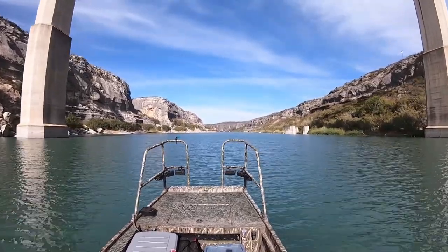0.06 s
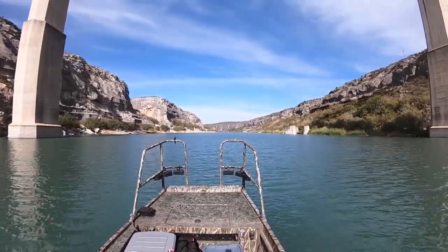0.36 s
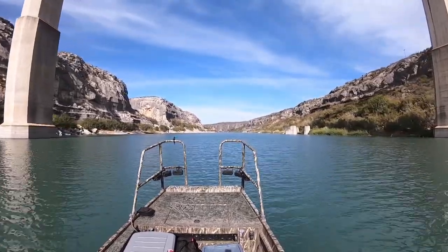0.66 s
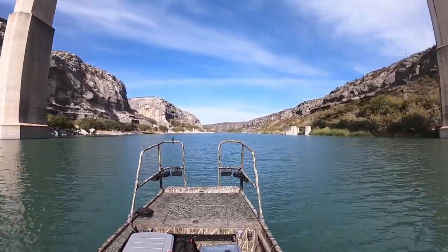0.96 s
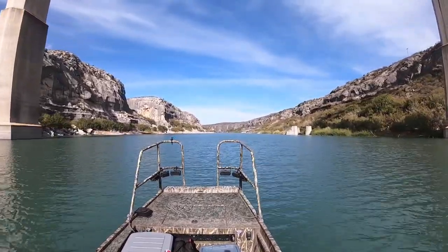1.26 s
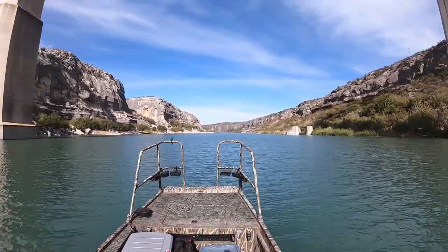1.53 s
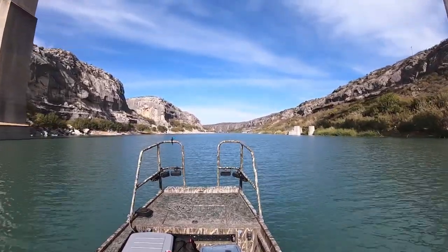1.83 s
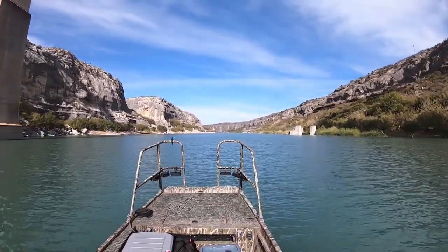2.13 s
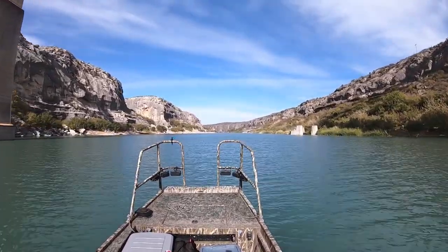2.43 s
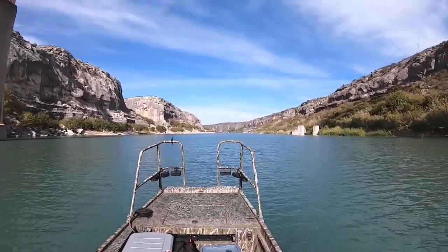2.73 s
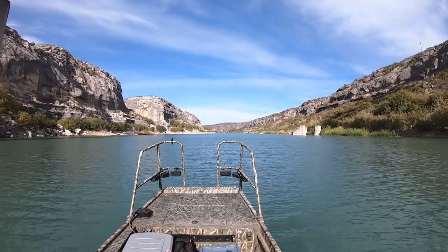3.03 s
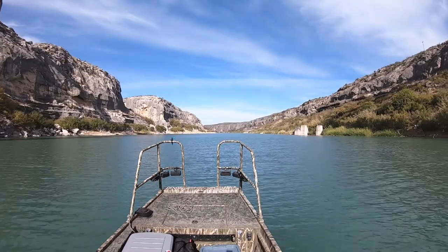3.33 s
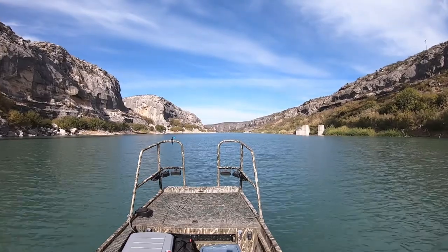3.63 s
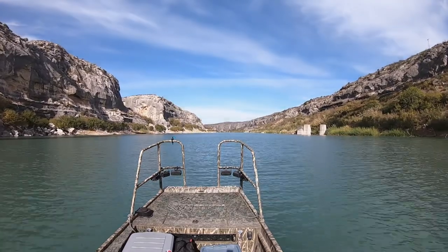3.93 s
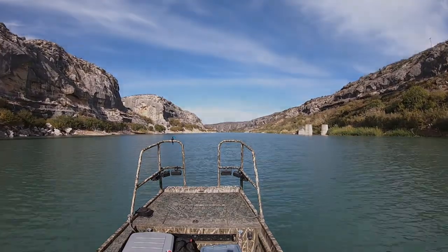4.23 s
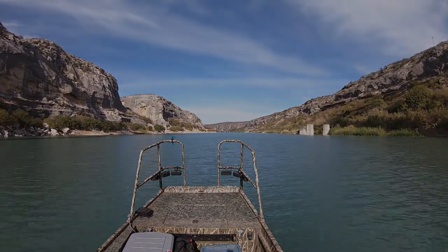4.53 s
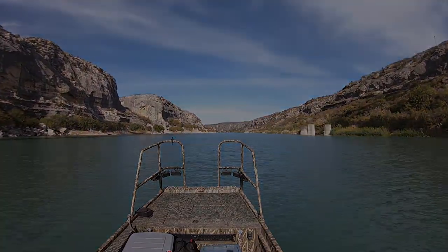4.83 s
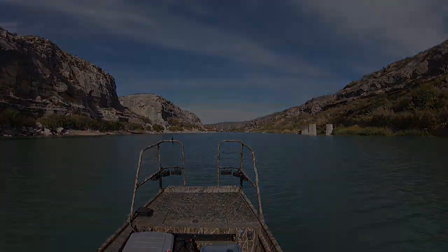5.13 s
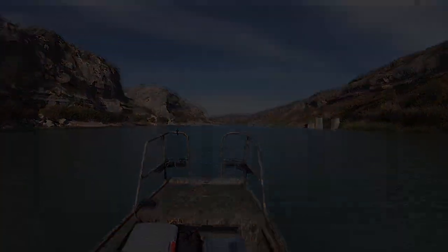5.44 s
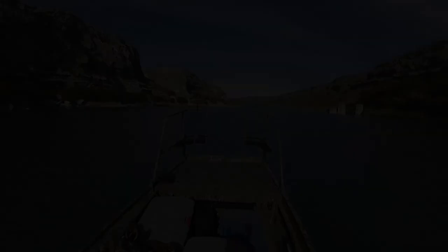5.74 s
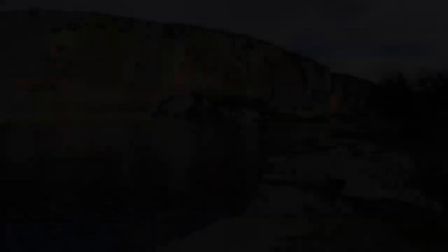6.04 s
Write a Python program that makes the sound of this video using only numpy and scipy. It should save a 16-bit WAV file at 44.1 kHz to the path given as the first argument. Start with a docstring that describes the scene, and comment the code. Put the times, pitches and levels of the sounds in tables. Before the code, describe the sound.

A small outboard motor runs at steady throttle, heard from aboard a flat-bottom boat on a river. Its low, slightly pulsing drone carries a buzz and fast mechanical clatter. Spray hisses lightly on the right and wind buffets the microphone. After about four seconds everything fades out together, and a faint puff of wind rumble follows at the very end.

```python
"""On a river, aboard a flat-bottom boat pushed by a small four-stroke outboard at steady throttle.
Periodic exhaust puffs form a harmonic series that beats against the propeller's blade tone.
The casing buzzes in forced vibration, valves and pistons clatter, and the wake hisses on the right.
The boat fades out and gives way to a faint rumble of wind on the microphone."""
import sys
import numpy as np
from scipy import signal
from scipy.fft import rfft, irfft, next_fast_len
from scipy.io import wavfile
from scipy.ndimage import map_coordinates

SR = 44100
rng = np.random.default_rng(int(sys.argv[2]) if len(sys.argv) > 2 else 0)


def store_pcm(level_fs):
    """Save levels as 16-bit WAV."""
    pcm = np.round(np.clip(level_fs, -1, 1) * 32767).astype(np.int16)
    wavfile.write(sys.argv[1], SR, np.atleast_2d(pcm).T)


N = 272979
TIME = np.arange(N) / SR
CYCLE_HZ, SAG_HZ_PER_S = 29.86, .03  # starting rate of four-stroke cycles, and its sag under load


def amp(db):
    """Amplitude ratio of a level in decibels."""
    return 10 ** (np.asarray(db) / 20)


def unit(x):
    """Normalisation to rms 1."""
    return x / np.sqrt(np.mean(x ** 2) + 1e-20)


def wobble(rate):
    """Smooth random modulation: a spline through `rate` Gaussian knots a second."""
    knots = rng.standard_normal(int(N * rate / SR) + 4)
    places = np.arange(0, len(knots) - 1, 1 / 10)
    return np.interp(TIME * rate, places, map_coordinates(knots, [places]))


def burst(cycle, place, length):
    """A pulse train: one Gaussian bump in every engine cycle."""
    return np.exp(-(((cycle - place + .5) % 1 - .5) / length) ** 2)


def filtered(x, response):
    """Linear filtering: the spectrum of x is multiplied by a frequency response."""
    size = next_fast_len(N + 8192)
    return irfft(rfft(x, size) * response(np.fft.rfftfreq(size, 1 / SR)), size)[..., :N]


def coloured(white, spectrum):
    """Spectral shaping: white noise of rms 1 takes on a left and a right spectral density."""
    table_hz, *sides = np.transpose(spectrum)
    gain = lambda hz: amp([np.interp(np.log(hz + 1), np.log(table_hz), side) for side in sides])
    return filtered(white, gain) * np.sqrt(SR / 2)


def two_sided(shared, lead_s=.00023):
    """Partial coherence: stereo white noise whose shared part reaches the right side first."""
    right, own = rng.standard_normal((2, N))
    late = filtered(right, lambda hz: np.exp(-2j * np.pi * hz * lead_s))
    left = shared * late + np.sqrt(1 - shared ** 2) * own
    return np.array([left, right])


# Spectrum of the breeze. Each row: frequency in Hz, left and right relative density in dB.
BREEZE_SPECTRUM = [(8, -65, -68), (32, -54.5, -56.5), (55, -59.5, -58), (111, -72, -81), (252, -99, -101),
                   (800, -106, -107), (2000, -119, -119), (5000, -123, -123), (15000, -138, -138)]

def breeze(start_s=5.918, rise_s=.012, gust_db=12, gust_s=.052, freshen_db_per_s=20, tick_t60_s=.06):
    """As the scene changes, a soft tick decays exponentially; then light turbulence gusts once, drops and
    freshens."""
    age = np.maximum(TIME - start_s, 0)
    tick = amp(-43.5 - 60 * age / tick_t60_s) * (age > 0)
    strength_db = -2.5 + gust_db * np.exp(-(age / gust_s) ** 2) + freshen_db_per_s * age
    onset = np.minimum(age / rise_s, 1)
    return amp(strength_db) * onset * wind(BREEZE_SPECTRUM, eddy_db=1.0) + tick


# Spectrum of the head wind. Each row: frequency in Hz, left and right density in dB per Hz.
HEAD_WIND_SPECTRUM = [(5, -63, -62), (25, -55.5, -49), (45, -55, -55), (75, -57, -50), (140, -60, -57),
                      (298, -64.5, -61.5), (1000, -110, -110)]

def wind(spectrum=HEAD_WIND_SPECTRUM, eddy_db=5.5):
    """Turbulent pressure: eddies buffet each microphone port independently."""
    eddies = amp(eddy_db * np.array([wobble(7), wobble(7)]))
    return coloured(rng.standard_normal((2, N)) * unit(eddies), spectrum)


# Spectrum of the spray. Each row: frequency in Hz, left and right density in dB per Hz.
SPRAY_SPECTRUM = [(800, -105, -95), (3500, -87, -85), (5000, -104, -84.5), (7100, -105, -81.5),
                  (7800, -107, -85), (8300, -110, -81.5), (8860, -114, -85.5), (9850, -116, -82.5),
                  (11080, -126, -93), (12740, -134, -99), (14700, -138, -102), (14800, -142, -126)]

def wake(splash_db=.63, droplet_db=1.3):
    """Incoherent summation: fine droplets peeling off the hull add up to a flickering hiss."""
    flow = amp(splash_db * wobble(18) + droplet_db * wobble(900))
    return coloured(two_sided(shared=.18) * unit(flow), SPRAY_SPECTRUM)


# Valve and piston knocks. Each row: place in the cycle from 0 to 1, half-width in cycles, relative power.
ENGINE_KNOCKS = [(.18, 0.062, 0.34), (.4, 0.036, .25), (.73, 0.086, 0.53), (.84, .05, 0.38)]
# Spectrum of the clatter. Each row: frequency in Hz, left and right density in dB per Hz.
CLATTER_SPECTRUM = [(200, -88, -65.5), (467, -65, -62), (620, -68, -55), (834, -67.5, -56.5),
                    (1174, -72.5, -59.5), (1630, -73.5, -63.5), (2020, -76.5, -67.5), (2410, -79.5, -72.5),
                    (3260, -80.5, -77), (4020, -88.5, -89), (7000, -110, -102), (14000, -140, -125)]

def clatter(cycle, uneven=.19, crank_depth=.075, flutter_db=.36):
    """Impact noise: valves and pistons knock in every cycle, never twice alike, over gear noise."""
    knocks = sum(strength * burst(cycle, place, length) * np.exp(uneven * wobble(30))
                 for place, length, strength in ENGINE_KNOCKS)
    gears = 1 + crank_depth * np.cos(4 * np.pi * (cycle - .78))  # the crank turns twice a cycle
    envelope = np.sqrt(gears + knocks) * amp(flutter_db * wobble(14))  # the powers add
    return coloured(two_sided(shared=.3) * unit(envelope), CLATTER_SPECTRUM)


# Radiation of the cowling and hull. Each row: frequency in Hz, left and right relative level in dB.
PANEL_RADIATION = [(357, -46.5, -45), (414, -50, -49), (448, -58.5, -57), (480, -43, -42.5),
                   (566, -49, -48.5), (604, -40.5, -37), (720, -54.5, -48.5), (860, -57, -49.5),
                   (1150, -66, -56.5)]
# Gear and valve train whine. Each row: multiple of the cycle rate, left and right relative level in dB.
GEAR_WHINE = [(26, -59, -43), (27, -54, -41), (28, -56, -37), (31, -68, -46), (33, -56, -53),
              (36, -60, -40.5), (40, -54, -39.3), (42, -64, -47.5), (44, -56, -48.5), (48, -58, -48),
              (50, -61, -59), (51, -58, -59), (66, -74, -56), (69, -68, -57)]

def casing(cycle, buzz_orders=range(12, 40), buzz_db=.17, whine_db=.64, waver_db=1.26, slip_rad=.24):
    """Forced vibration: panels buzz and gears whine at wavering harmonics of the cycle rate."""
    hz, *sides = np.transpose(PANEL_RADIATION)
    levels = {}
    for order in buzz_orders:
        levels[order] = [buzz_db + np.interp(np.log(order * CYCLE_HZ), np.log(hz), s) for s in sides]
    for order, left_db, right_db in GEAR_WHINE:  # whine replaces buzz on a shared harmonic
        levels[order] = [whine_db + left_db, whine_db + right_db]
    buzz = np.zeros((2, N))
    for order, (left_db, right_db) in levels.items():
        phase = 2 * np.pi * order * cycle + rng.uniform(0, 2 * np.pi) + slip_rad * wobble(11)
        apart = (order / 28) ** 2  # short waves differ more in phase from side to side
        pair = [amp(left_db) * np.sin(phase), amp(right_db) * np.sin(phase + apart)]
        buzz += np.sqrt(2) * np.array(pair) * amp(waver_db * wobble(7))
    return buzz


def propeller(cycle, blade_order=3.064, db=-28):
    """Beating: the blade tone, just above the exhaust's third harmonic, beats with it twice a second."""
    blades = np.sqrt(2) * np.sin(2 * np.pi * (blade_order * cycle + .72))
    return blades * amp(db) * amp([[-.3], [.3]])


# Harmonics of the exhaust note. Each row: multiple of the cycle rate, relative level in dB.
EXHAUST_HARMONICS = [(1, -34), (2, -23.5), (3, -30), (4, -32), (5, -27.7), (6, -35), (7, -35.5), (8, -29.3),
                     (9, -33), (10, -34), (11, -39.5)]
# Spectrum of the turbulent gas. Each row: frequency in Hz, left and right density in dB per Hz.
CHUFF_SPECTRUM = [(20, -84, -83), (60, -64, -61), (98, -54, -54.5), (137, -59.5, -59.5),
                  (180, -52.5, -53.5), (280, -58.5, -57), (380, -59.5, -58.5), (514, -64.5, -66),
                  (656, -61, -61.5), (1020, -87, -81), (2500, -120, -120)]

def exhaust(cycle, db=-.45, floor_db=-42, smear_rad=.1308, odd_lag_rad=.8, uneven_db=.24, surge=.17):
    """Pipe resonance: unequal puffs of two cylinders ring the exhaust leg, with a turbulent chuff."""
    level_db = np.transpose(EXHAUST_HARMONICS)[1]
    gain = amp(np.r_[floor_db, level_db, np.full(len(level_db), floor_db)])
    # minimum phase: the pipe rings after each puff, never before
    mirrored_gain = np.r_[gain, gain[-2:0:-1]]
    pipe_lag = signal.hilbert(np.log(mirrored_gain)).imag
    note = np.zeros(N)
    for order, _ in EXHAUST_HARMONICS:
        # the hull delays the upper partials; the cylinders' imbalance puts the odd ones out of step
        lag = pipe_lag[order] + smear_rad * order ** 2 + odd_lag_rad * (order % 2)
        note -= np.sqrt(2) * gain[order] * np.cos(2 * np.pi * order * (cycle + .27) - lag)
    note *= amp(db + uneven_db * wobble(22.1))
    gas = rng.standard_normal(N) * unit(1 + surge * burst(cycle, place=.03, length=.03))
    return note * amp([[-.4], [.4]]) + coloured(gas, CHUFF_SPECTRUM)


def scene(fade_start_s=3.96, fade_end_s=5.912):
    """Superposition: motor, wake and head wind add and fade out together; the breeze follows."""
    cycle = np.cumsum(CYCLE_HZ - SAG_HZ_PER_S * TIME) / SR  # engine cycles turned so far
    motor = exhaust(cycle) + propeller(cycle) + casing(cycle) + clatter(cycle)
    boat = motor + wake() + wind()
    fade = np.interp(TIME, [0, .002, fade_start_s, fade_end_s], [0, 1, 1, 0])
    return boat * fade + breeze()


def record(dry, top_hz=15600):
    """Band limiting: an ideal low-pass filter removes everything above top_hz."""
    return filtered(dry, lambda hz: hz < top_hz)


dry = scene()
out = record(dry)
store_pcm(out)
```